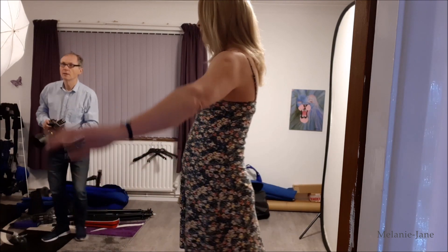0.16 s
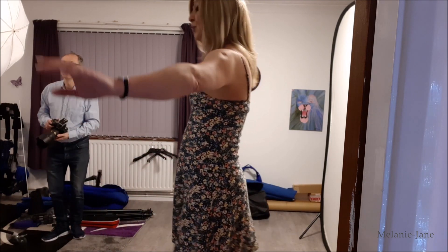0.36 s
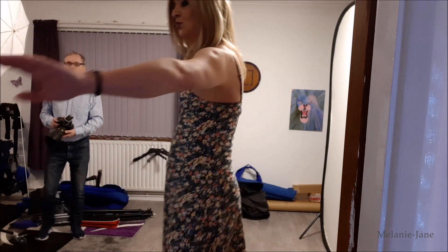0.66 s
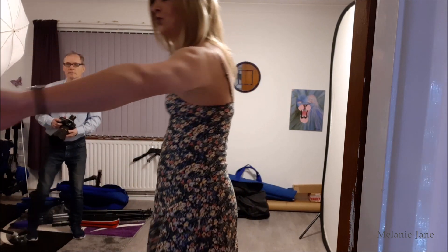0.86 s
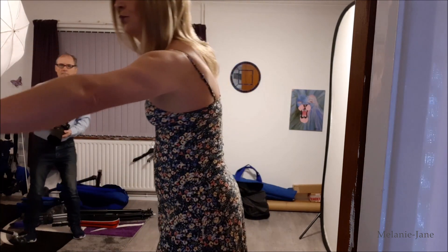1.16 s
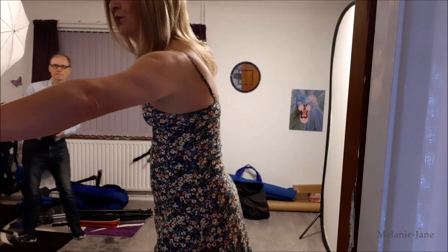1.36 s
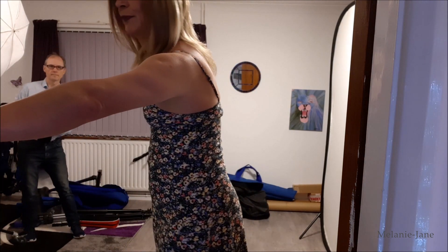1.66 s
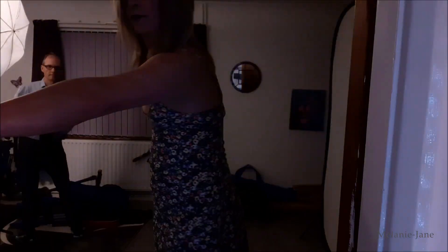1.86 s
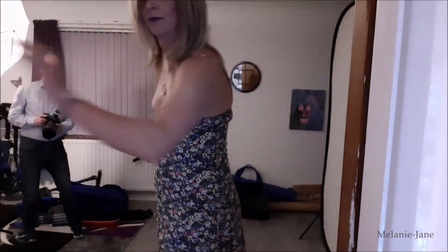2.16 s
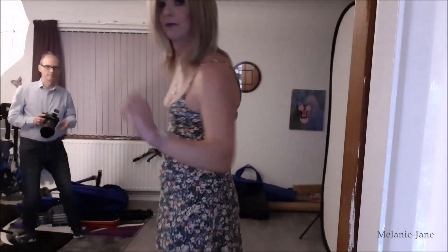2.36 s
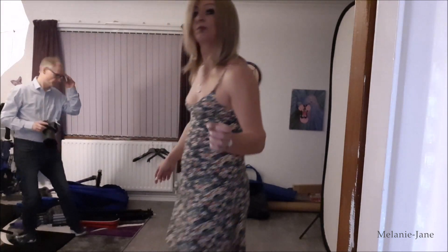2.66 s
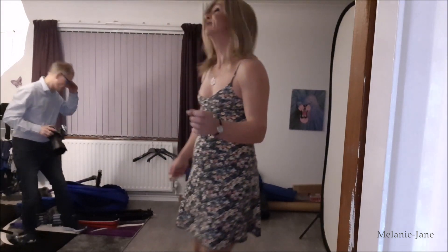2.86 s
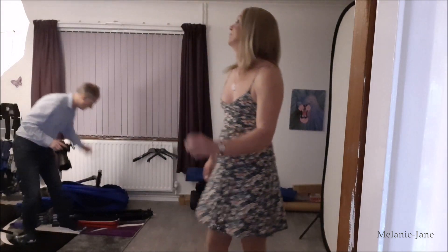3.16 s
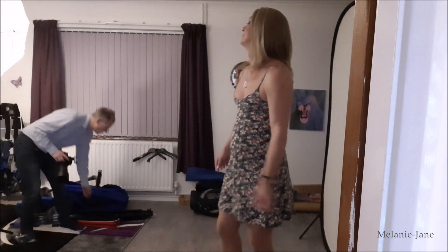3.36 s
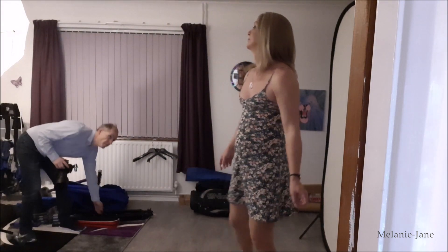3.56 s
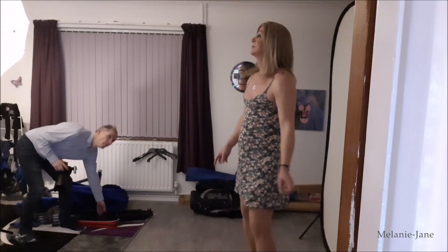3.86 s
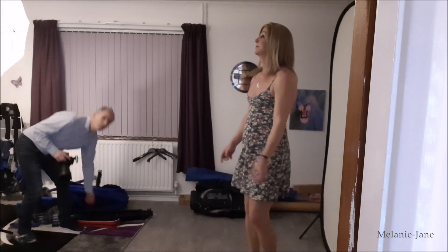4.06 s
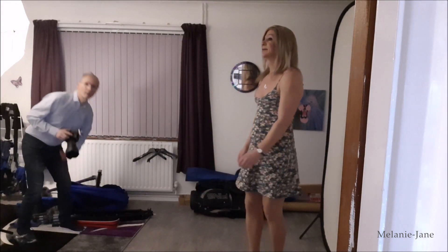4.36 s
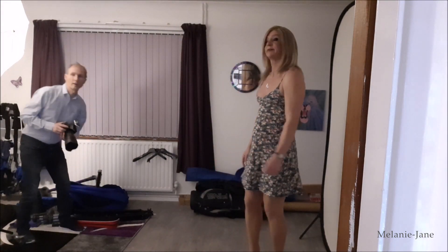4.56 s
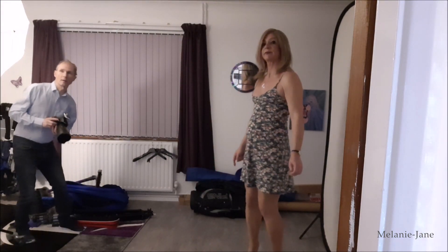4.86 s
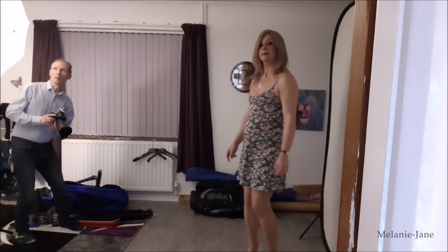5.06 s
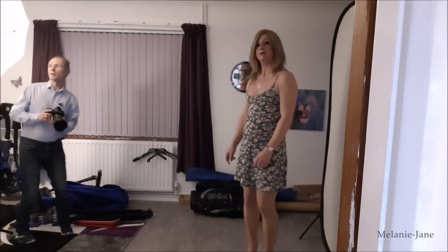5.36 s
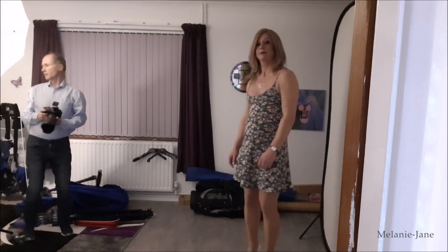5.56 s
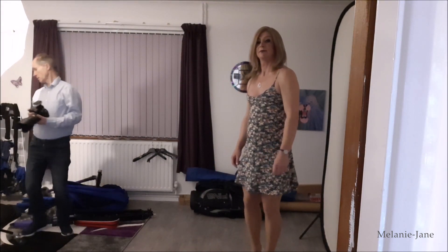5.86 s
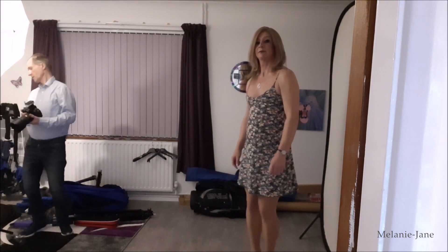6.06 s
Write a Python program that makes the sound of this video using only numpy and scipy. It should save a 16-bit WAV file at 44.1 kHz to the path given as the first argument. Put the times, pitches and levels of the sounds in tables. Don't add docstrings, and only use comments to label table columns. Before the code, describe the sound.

Hard-heeled shoes on a laminate floor in a furnished room: a knock and slap, another firm pair, then a pause with a cloth swish, tiny metal tinks and a small clack. Steps resume heavily, with a sharp snap and the hardest slap past the middle, then a sole drag and soft last touches. Close stereo microphone, short room echo, faint hiss and low rumble.

```python
import sys
import numpy as np
from scipy import signal
from scipy.fft import rfft, irfft
from scipy.io import wavfile
from scipy.ndimage import uniform_filter1d

SR = 44100
rng = np.random.default_rng(int(sys.argv[2]) if len(sys.argv) > 2 else 0)


def level_to_linear(level):
    exponent = np.asarray(level, float) / 20
    return 10 ** exponent


def wrap_up_sound(samples):
    columns = np.atleast_2d(samples).T
    tamed = np.clip(columns, -1, 1)
    steps = np.round(tamed * 32767).astype(np.int16)
    wavfile.write(sys.argv[1], SR, steps)


N = 274037
TAIL = 22050

# weight/dB, knock/dB, crack/dB
HEELS = [
    (0.089, -23.5, -3.5, -32, -37.5),
    (0.646, -21, -7.5, -30, -30.5),
    (0.849, -45, -24, -36.5, -47),
    (2.421, -19.5, -13.5, -19, -46),
    (2.539, -17, -13.5, -14, -19.5),
    (3.078, -25, -3, -12, -23.5),
    (3.718, -30.5, -1.5, -7.5, -20.5),
    (4.806, -32, -1.5, -25, -23.5),
    (5.395, -17.5, -5, -15.5, -35),
    (5.789, -46.5, -11, -12.5, -29),
]
# weight/dB, knock/dB, crack/dB
SOLES = [
    (0.16, -16.5, -10, -12, -33.5),
    (0.281, -37.5, -23, -4.5, -11.5),
    (0.667, -22.5, -10.5, -31, -27.5),
    (3.156, -18.5, -1.5, 1.5, -20.5),
    (3.815, -17, 0.5, -4.5, -28),
    (3.918, -32, -9.5, -2, 3.5),
    (4.305, -12, -2, -3.5, -19.5),
    (4.824, -18.5, -8.5, -7, -28),
    (5.033, -39.5, -13.5, -15.5, -15.5),
    (6.031, -29.5, -10, -25.5, -37),
]
# weight/dB, knock/dB, crack/dB
TOES = [
    (0.001, -56.5, -6, -11, -28),
    (1.959, -59, 2, -9, -5),
    (3.649, -44, -0.5, -11, -13),
    (4.273, -45.5, 15.5, -6.5, -1.5),
    (4.549, -55, 4.5, -5, -19.5),
]
HEEL_RING_DB, SOLE_RING_DB, TOE_RING_DB = -20.5, -1, 0.5
# f/Hz, width/Hz, level/dB
BOARD_MODES = [(141, 5, -0.5), (154.6, 11, -5), (197.7, 6, 6), (230, 8.3, 4.5), (269.4, 14, 1),
               (297, 30, -1), (385, 26, 0), (392, 72, 0.5), (476.4, 21, 0.5), (537.5, 25, -1.5),
               (620, 54, 2.5), (724, 29, -12), (720, 50, -6), (800, 150, -8.5), (870, 60, -4.5),
               (1069, 41, -12.5)]
# f/Hz, level/dB per Hz
KNOCK_COLOUR = [(470, -21), (800, -7), (1070, -11), (1450, -14), (1600, -15), (1770, -20.5), (2800, -29.5),
                (3640, -57), (6160, -120)]
# f/Hz, level/dB per Hz
CRACK_COLOUR = [(1290, -33), (2200, 3.5), (2550, -3.5), (4720, 0.5), (7900, -12.5), (8800, -22),
                (14400, -11.5), (16000, -30.5)]
THUD_HZ, THUD_WIDTH_HZ, THUD_DB = 480, 750, -12.5
SETTLE_S = 0.0015
LOWEST_HZ = 110

# t/s, peak level/dB
PUSHES = [
    (0.1612, -11),
    (0.6692, -10),
    (2.542, -15),
    (3.158, -20),
    (3.817, -20),
    (4.307, -18),
    (4.826, -28),
]
PUSH_HZ, PUSH_WIDTH_HZ = 450, 200

# t/s, peak level/dB, f/Hz
UNDERFOOT = [(0.09, -41, 388), (0.161, -32, 392), (0.281, -63, 413), (0.669, -31, 385),
             (0.669, -35.5, 521.5), (0.86, -62.5, 408), (2.423, -40, 385), (2.541, -35, 385),
             (2.542, -35, 563), (3.078, -40.5, 343), (3.158, -30, 290), (3.719, -37, 286),
             (3.817, -31.5, 289), (4.307, -24.5, 280), (4.307, -28, 477), (4.826, -35.5, 277),
             (5.031, -51, 302), (5.395, -38, 319), (0.668, -50, 970), (5.395, -50, 930), (6.032, -48, 720),
             (5.395, -42, 550), (0.668, -40.5, 147), (6.033, -38.5, 470), (6.033, -39, 230),
             (0.161, -38.5, 730), (3.158, -39, 790), (4.308, -39.5, 1010), (6.034, -55, 880),
             (4.42, -42, 140)]
PRESSED_T60_S, FREE_T60_S, PRESSED_ABOVE_DB = 0.37, 0.81, -35.2
WIDENING, WIDE_FROM_HZ = 0.5, 450

# t/s, peak level/dB, centre f/Hz, low part/dB, top part/dB
SNAPS = [
    (0.0942, -53, 2680, -18, 9),
    (0.2803, -33, 2700, -9, -7),
    (0.6875, -42.5, 2730, -27, 1),
    (2.4738, -36, 4150, -19.5, -10),
    (3.717, -27, 5700, -7.5, -11),
    (3.915, -13.5, 5970, -4, 0),
    (4.3351, -29.5, 3090, -1, -0.5),
    (4.812, -40.5, 7400, -8.5, 2.5),
    (5.8625, -48, 4800, -19, -5.5),
    (6.0436, -48, 4900, -10, -5.5),
]

# t/s, then peak level/dB of each mode
TINKS = [
    (1.159, -62.5, -99, -99, -99),
    (1.299, -76, -80.5, -71, -99),
    (1.561, -99, -72.5, -99, -71),
    (1.737, -67.5, -99, -62, -70.5),
]
# f/Hz, t60/s, width/Hz
FITTING_MODES = [(6760, 0.45, 150), (10500, 0.34, 80), (13100, 0.59, 90), (14600, .2, 300)]
# f/Hz, peak level/dB, t60/s, width/Hz
CATCH_MODES = [(6440, -71, .34, 320), (9700, -56, 0.12, 630), (5980, -44.5, 0.37, 780),
               (10800, -53.5, 0.37, 1300), (13700, -51.5, 0.18, 1700), (7300, -50.5, 0.24, 740),
               (1490, -67, 0.52, 360), (3100, -69.5, 0.33, 110)]
CATCH_S = 1.811
# t/s, peak level/dB, f/Hz, t60/s, width/Hz
TICKS = [(0.281, -44.5, 1150, 0.2, 250), (3.657, -61.5, 1542, 0.44, 79), (3.655, -56.5, 800, 0.271, 86),
         (4.465, -54.5, 3680, 0.16, 700), (4.475, -53.5, 3000, 0.29, 1100), (4.95, -63, 3100, 1, 1190)]

# t/s of the crest, level/dB, rise/s and fall/s (each for 10 dB)
SWISHES = [
    (1.101, -46, 0.041, .095),
    (1.79, -63, 0.071, .01),
    (2.004, -51, 0.07, .11),
    (3.077, -60.5, 0.14, .003),
    (4.2, -64.5, 0.18, .06),
    (4.302, -40, 0.022, .003),
    (5.07, -80, .12, .12),
]
# f/Hz, level/dB per Hz
SWISH_COLOUR = [(710, -25.5), (1200, -25), (1540, -12), (1660, -26.5), (2020, -16), (4550, -4), (8820, -15),
                (13700, -9), (16000, -19.5)]
# t/s, length/s, lower resonances level/dB, upper resonance level/dB
DRAGS = [
    (4.098, 0.13, -72, -73),
    (4.936, 0.51, -52.5, -62),
]
# f/Hz, width/Hz, level/dB
DRAG_MODES = [(1310, 130, 2.5), (1460, 250, 8.5), (1988, 89.6, 16.5)]

RUMBLE_DB, OPEN_DB, OPEN_FOLLOWS, OPEN_LAG_S = -60, -40, 0.45, 0.063
RUMBLE_HZ, RUMBLE_WIDTH_HZ, WANDER_HZ = 43, 6, 0.7
# f/Hz, level/dB
MAINS = [(100, -76), (200, -78.5)]
# f/Hz, level/dB per Hz
HISS_COLOUR = [(41, -31), (70, -1), (148, -15), (208, -8), (250, -19.5), (394, -18), (1070, -26.5),
               (1510, -24.5), (5020, -28.5), (6900, -31), (8280, -39), (13600, -20), (16000, -24.5)]
HISS_DB = -63.5

# f/Hz, likeness/0..1
LIKENESS = [(60, .96), (180, .975), (350, .92), (700, .72), (1400, .36), (2800, .07), (5000, 0)]
# f/Hz, left minus right/dB
LEAN = [(60, -3.5), (500, -1.85), (1200, -2), (4000, -1), (10000, -1.5)]
CUTOFF_HZ = 15900


def steps():
    out = np.zeros((2, N))
    click = np.eye(1, TAIL) * np.ones((2, 1))
    for s, peak_db, boom_db, ring_db, knock_db, crack_db in contacts():
        echoes = response(1.0, direct_db=-35.5, spiky_db=1.5)
        ringing = np.zeros((2, TAIL))
        strengths = rng.normal(0, 0.5, (len(BOARD_MODES), 2))
        for (hz, width_hz, mode_db), (struck_db, room_db) in zip(BOARD_MODES, strengths):
            width_hz = max(width_hz, 8 + hz / 25)
            struck = level_to_linear(struck_db - 13) * even(resonance(click, hz, width_hz * 1.4))
            sustained = level_to_linear(room_db) * even(resonance(echoes, hz, width_hz))
            ringing += level_to_linear(mode_db - 11.5) * (sustained - struck)
        ringing -= level_to_linear(THUD_DB) * even(resonance(click, THUD_HZ, THUD_WIDTH_HZ))
        contact = [(70, boom_db - 33), (125, boom_db), (210, boom_db), (330, 0.009), (650, ring_db),
                   (1100, knock_db - 4), (2400, knock_db - 27), (5000, knock_db - 53.5)]
        wood = np.roll(response(0.7, direct_db=9, spiky_db=-2), 40, axis=1)
        hard = np.roll(response(0.53, direct_db=9.5, early_db=-2, spiky_db=4), 40, axis=1)
        knock = level_to_linear(knock_db - 3) * even(coloured(wood, KNOCK_COLOUR))
        crack = level_to_linear(crack_db + 7) * even(coloured(hard, CRACK_COLOUR))
        add(out, s + SETTLE_S, level_to_linear(peak_db - 21.5) * (shaped(ringing, contact) + knock + crack))
    return out


def contacts():
    found = []
    for rows, ring_db in [(HEELS, HEEL_RING_DB), (SOLES, SOLE_RING_DB), (TOES, TOE_RING_DB)]:
        for s, peak_db, boom_db, knock_db, crack_db in rows:
            found.append((s, peak_db, boom_db, ring_db, knock_db, crack_db))
    return sorted(found)


def pushes():
    out = np.zeros((2, N))
    pulse = resonance(np.eye(1, 2000), PUSH_HZ, PUSH_WIDTH_HZ)
    pulse = resonance(pulse, PUSH_HZ, 4 * PUSH_WIDTH_HZ)
    pulse = np.pad(pulse / np.abs(pulse).max(), ((0, 0), (0, TAIL)))
    for s, peak_db in PUSHES:
        add(out, s, -level_to_linear(peak_db) * pulse)
    return out


def underfoot():
    rows = []
    for s, peak_db, hz in UNDERFOOT:
        t60 = PRESSED_T60_S if peak_db > PRESSED_ABOVE_DB else FREE_T60_S
        rows.append((s, peak_db, hz, t60, WIDENING * (hz - WIDE_FROM_HZ)))
    return partials(rows, direct_db=22.5, close_s=0.13)


def snaps():
    out = np.zeros((2, N))
    for s, peak_db, hz, low_db, top_db in SNAPS:
        hump = [(900, low_db + 4.5), (1500, low_db + 8.5), (hz * 0.42, low_db * 1.8), (hz, 0),
                (hz * 1.1, top_db * 0.19), (12000, top_db - 9.5)]
        body = response(1.0, direct_db=14, close_s=0.12, early_db=-1.5, spiky_db=-6.5)
        body = coloured(np.roll(body, 20, axis=1), hump)
        top = response(0.98, direct_db=10.5, close_s=0.12, early_db=7, spiky_db=6)
        top = coloured(np.roll(top, 20, axis=1), [(9000, -8.5), (12500, -3), (16000, -9.5)])
        add(out, s, level_to_linear(peak_db - 10.5) * (body + level_to_linear(top_db - 5.5) * top))
    return out


def tinks():
    fitting = []
    for s, *peaks in TINKS:
        for peak_db, mode in zip(peaks, FITTING_MODES):
            if peak_db > -90:
                fitting.append((s, peak_db, *mode))
    catch = [(CATCH_S, peak_db, hz, t60, width_hz) for hz, peak_db, t60, width_hz in CATCH_MODES]
    return partials(fitting + catch + TICKS, direct_db=15, close_s=0.32)


def rubbing():
    rough = stereo(N)
    voices = []
    for hz, width_hz, level_db in DRAG_MODES:
        voice = resonance(resonance(rough, hz, width_hz), hz, width_hz)
        voices.append(level_to_linear(level_db - 11) * rms_one(voice))
    low, middle, high = voices
    lower = drag_gain([(s, length, lower_db) for s, length, lower_db, _ in DRAGS], fade_db_per_s=29)
    upper = drag_gain([(s, length, upper_db) for s, length, _, upper_db in DRAGS], fade_db_per_s=63)
    sag = level_to_linear(-8 + 15 * np.exp(-((np.arange(N) / SR - 5.2) / 0.08) ** 2))
    cloth = swell() * coloured(stereo(N), SWISH_COLOUR)
    return cloth + upper * high + lower * (middle + sag * low)


def drag_gain(strokes, fade_db_per_s):
    t, gain = np.arange(N) / SR, np.zeros(N)
    for s, length, level_db in strokes:
        edges = np.clip(np.minimum(t - s, s + length - t) / 0.0048, 0, 1)
        gain += edges * level_to_linear(level_db - fade_db_per_s * np.clip(t - s, 0, length))
    return gain


def swell():
    t, gain = np.arange(N) / SR, np.zeros(N)
    for s, level_db, rise_s, fall_s in SWISHES:
        gain += level_to_linear(level_db - 10 * ((t - s) / np.where(t < s, rise_s, fall_s)) ** 2)
    return gain


def background(open_db=-0.5, hold_s=0.067):
    t, opening = np.arange(N) / SR, np.zeros(N)
    for row in contacts() + SNAPS:
        since = t - row[0]
        opening = np.maximum(opening, (since > 0) * np.exp(-(since / hold_s) ** 2))
    hiss = level_to_linear(HISS_DB + open_db * opening) * coloured(stereo(N), HISS_COLOUR)
    wander = uniform_filter1d(rng.standard_normal(N), size=4000)
    wander = rms_one(uniform_filter1d(wander, size=4000))
    hum = np.sqrt(2) * np.sin(2 * np.pi * np.cumsum(RUMBLE_HZ + WANDER_HZ * wander) / SR)
    rumble = hum + level_to_linear(-6) * resonance(stereo(N), RUMBLE_HZ + 8, RUMBLE_WIDTH_HZ * 3)
    buzz = sum(level_to_linear(level_db) * resonance(stereo(N), hz, 3.2) for hz, level_db in MAINS)
    return hiss + buzz + rumble_opening() * rumble


def rumble_opening():
    t = np.arange(N) / SR
    power = np.full(N, level_to_linear(RUMBLE_DB) ** 2)
    for s, peak_db, weight_db, *_ in HEELS + SOLES:
        since = np.maximum(t - s, 0) / OPEN_LAG_S
        level = level_to_linear(OPEN_DB + OPEN_FOLLOWS * (peak_db + weight_db))
        power += (level * since * np.exp(1 - since)) ** 2
    return np.sqrt(power)


def response(t60, direct_db, close_s=0.15, fill_s=0.0017, early_db=3.0, early_s=0.046, spiky_db=4.0):
    t = np.arange(TAIL) / SR
    early = np.exp(-t / early_s)
    spikes = np.repeat(np.minimum(rng.exponential(1, TAIL // 42), 3) - 1, 42)
    level_db = -60 * t / t60 - 10 * (t / close_s) ** 2
    level_db += early * (early_db + spiky_db * spikes)
    out = stereo(TAIL) * level_to_linear(level_db) * (1 - np.exp(-t / fill_s))
    out[:, 0] += level_to_linear(direct_db)
    return out


def partials(rows, direct_db, close_s):
    out = np.zeros((2, N))
    for s, peak_db, hz, t60, width_hz in rows:
        width_hz = max(width_hz, 75 + hz / 150)
        struck = response(t60, direct_db, close_s, early_db=-1.0, spiky_db=2.0)
        ring = resonance(resonance(struck, hz, width_hz), hz, width_hz * 4)
        add(out, s, level_to_linear(peak_db - 9) * even(ring))
    return out


def stereo(size):
    mid, side = rfft(rng.standard_normal((2, size)))
    alike = np.clip(at_hz(LIKENESS, np.fft.rfftfreq(size, 1 / SR)), 0, 1)
    pair = np.sqrt(1 + alike) * mid + np.sqrt(1 - alike) * side * [[1], [-1]]
    return irfft(pair, size) / np.sqrt(2)


def coloured(x, spectrum):
    hz = np.fft.rfftfreq(x.shape[-1], 1 / SR)
    low_end = 1 - 1 / (1 + (hz / spectrum[0][0] / 0.8) ** 10)
    high_end = 1 / (1 + (hz / spectrum[-1][0] / 1.2) ** 16)
    gain = level_to_linear(at_hz(spectrum, hz)) * low_end * high_end
    return irfft(rfft(x) * rms_one(gain), x.shape[-1])


def shaped(x, points):
    size = x.shape[-1]
    cepstrum = irfft(np.log(level_to_linear(at_hz(points, np.fft.rfftfreq(size, 1 / SR)))), size)
    cepstrum[1:size // 2] *= 2
    cepstrum[size // 2 + 1:] = 0
    return irfft(rfft(x) * np.exp(rfft(cepstrum)), size)


def resonance(x, hz, width_hz):
    r = np.exp(-np.pi * width_hz / SR)
    poles = [1, -2 * r * np.cos(2 * np.pi * hz / SR), r * r]
    return np.sqrt((1 - r * r) / 2) * signal.lfilter([1, 0, -1], poles, x + 1e-18)


def at_hz(points, hz):
    table_hz, value = np.transpose(points)
    return np.interp(np.log(hz + 1), np.log(table_hz), value)


def rms_one(x):
    return x / np.sqrt(np.mean(x ** 2) + 1e-20)


def even(sound):
    return rms_one(sound) * 1.78


def add(out, s, sound):
    i = round(s * SR)
    out[:, i:i + 17640] += sound[:, :min(17640, N - i)]


def scene():
    boards = steps() + pushes() + underfoot()
    high_pass = signal.butter(4, LOWEST_HZ, "high", fs=SR, output="sos")
    floor = signal.sosfilt(high_pass, boards)
    return floor + snaps() + tinks() + rubbing() + background()


def top_cut(x):
    return signal.sosfilt(signal.butter(12, 17000, fs=SR, output="sos"), x)


def record(dry):
    hz = np.fft.rfftfreq(N, 1 / SR)
    peaks_rounded = 0.7 * np.tanh(dry / 0.7)
    balance_db = np.outer([0.5, -0.5], at_hz(LEAN, hz))
    top_cut_db = np.clip((hz - CUTOFF_HZ) / 20, 0, 60)
    mix = irfft(rfft(peaks_rounded) * level_to_linear(balance_db - top_cut_db), N)
    return top_cut(mix)


dry = scene()
out = record(dry)
wrap_up_sound(out)
```